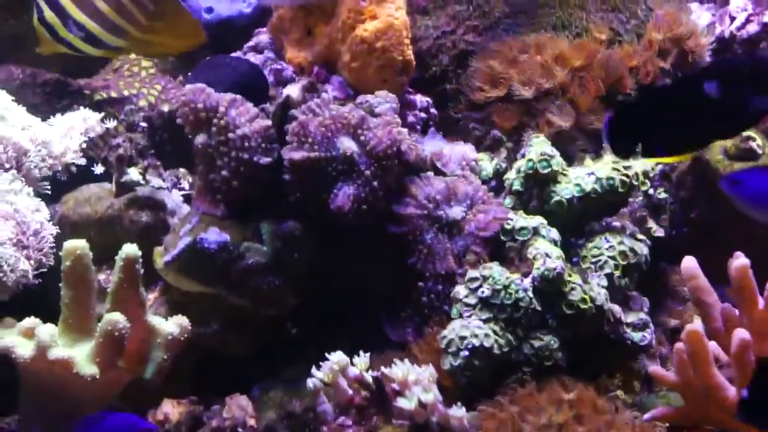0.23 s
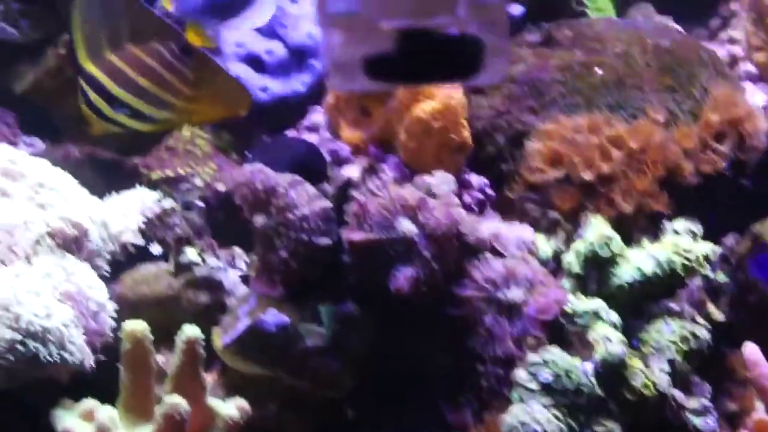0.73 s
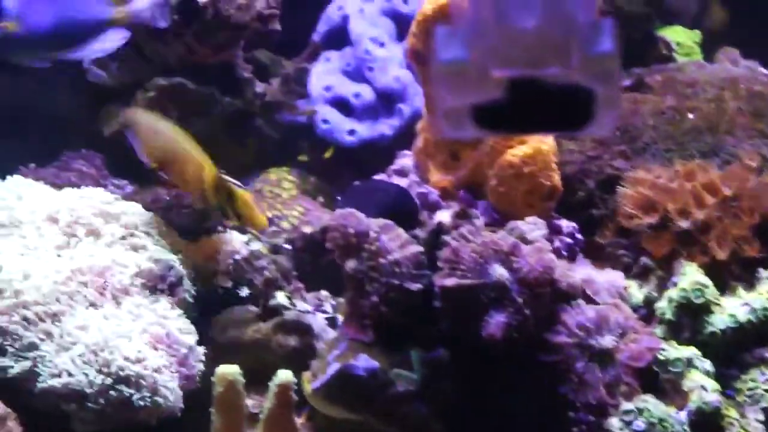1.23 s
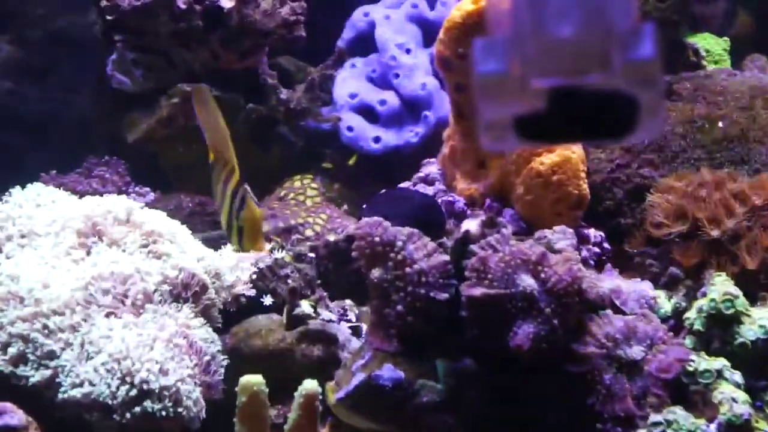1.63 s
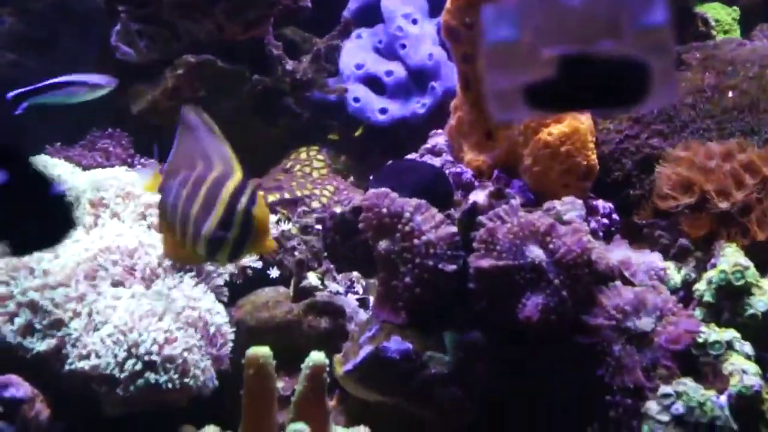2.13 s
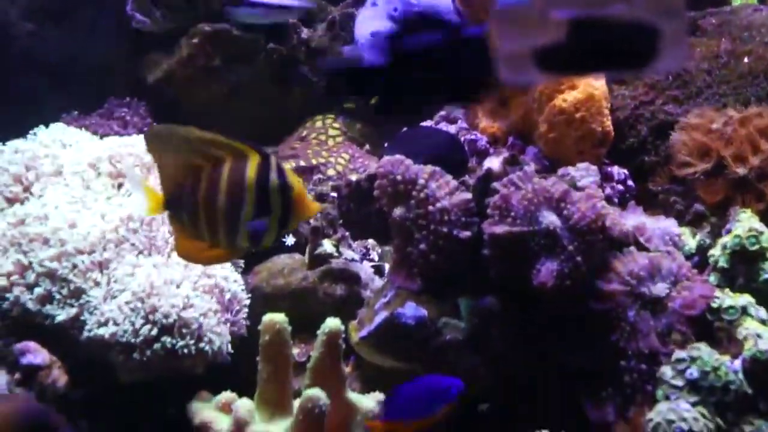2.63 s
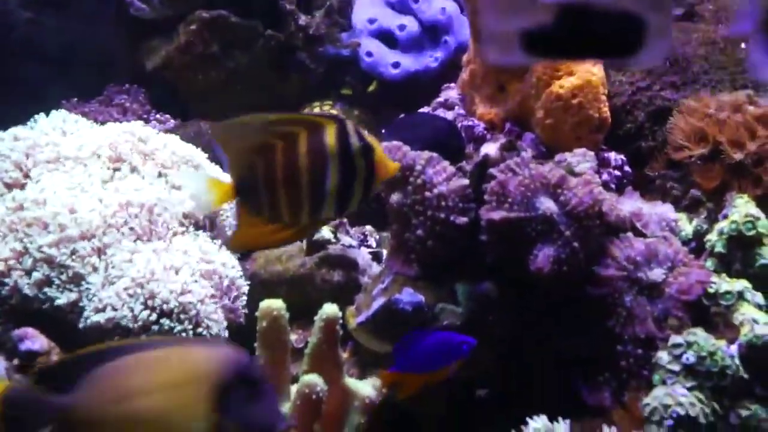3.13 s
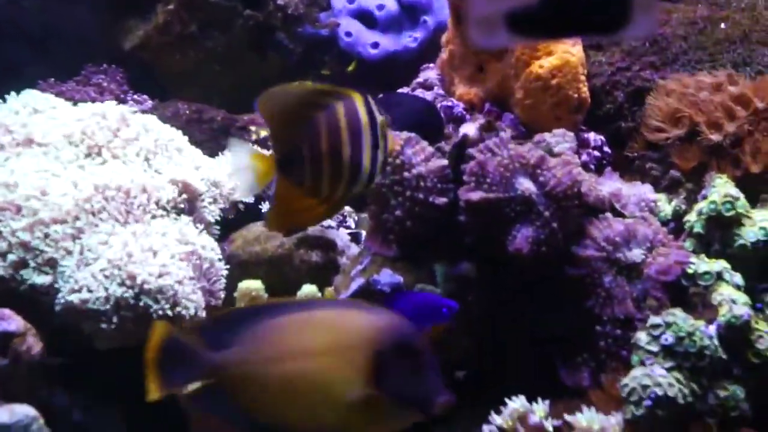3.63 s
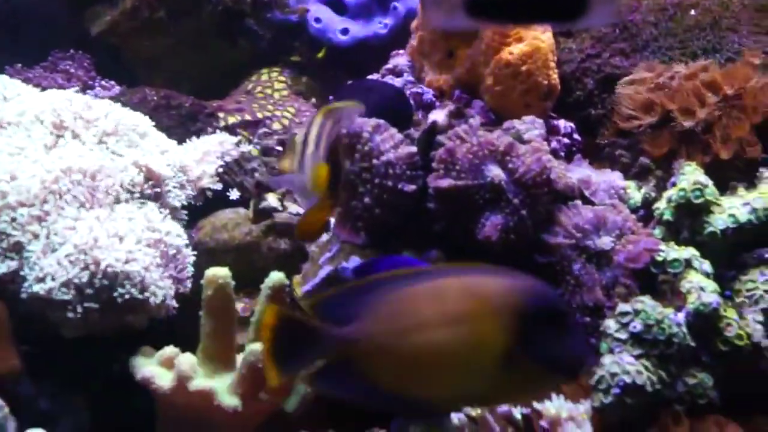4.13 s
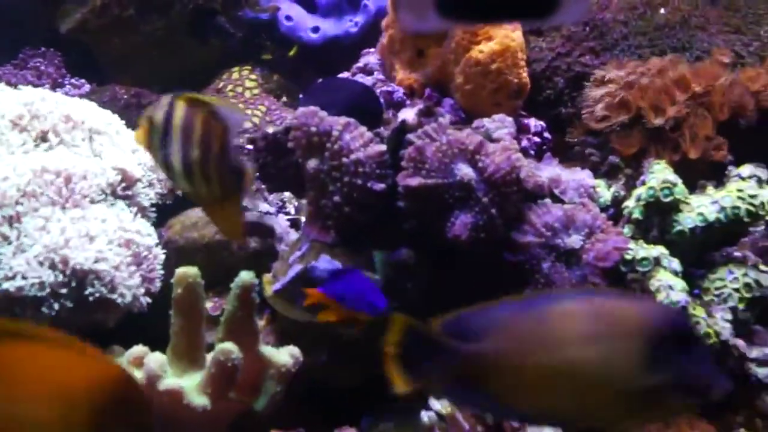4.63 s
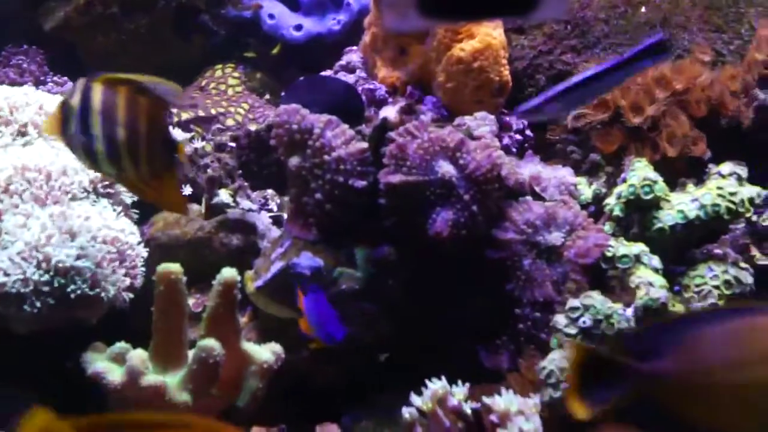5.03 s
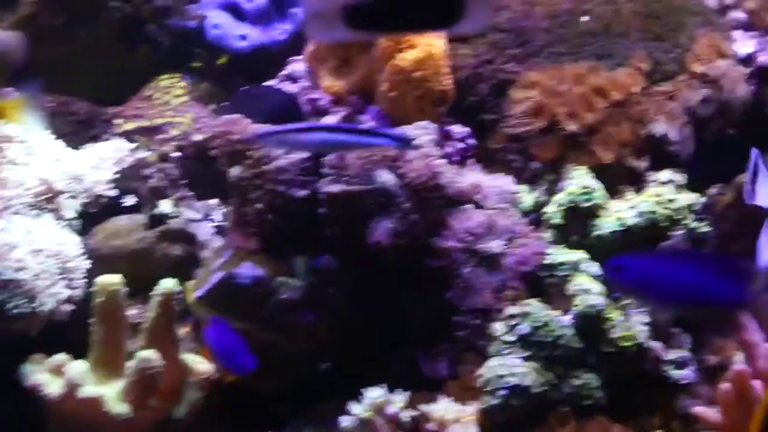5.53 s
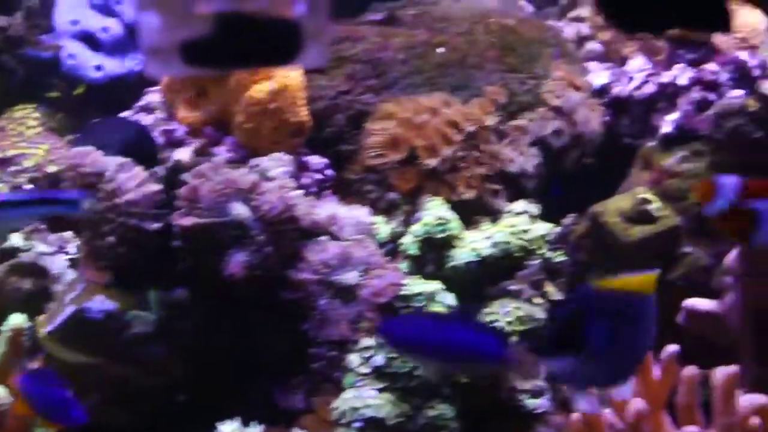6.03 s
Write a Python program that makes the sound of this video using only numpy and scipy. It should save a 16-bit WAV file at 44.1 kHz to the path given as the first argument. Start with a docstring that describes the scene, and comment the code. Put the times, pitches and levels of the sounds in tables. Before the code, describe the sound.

Aquarium pumps hum steadily with a soft watery wash and faint bubbling, while a bump, a knock and one sharp snap sound across the room.

```python
"""Under a home aquarium, close to the cabinet, a hand-held camera's two microphones hear the pumps throughout:
motor harmonics of the mains, noise of water and motors ringing in the cabinet, and short rising bubble rings.
Across the room come a soft bump at 1.2 s, a dull knock at 1.6 s and one sharp snap at 4 s: each is a set of
delayed impulses and a short noise tail, coloured by the modes of the struck thing."""
import sys
import numpy as np
from scipy import signal
from scipy.fft import rfft, irfft
from scipy.io import wavfile
from scipy.ndimage import uniform_filter1d

SR = 44100
rng = np.random.default_rng(int(sys.argv[2]) if len(sys.argv) > 2 else 0)


def dump(signal):
    """Clip the signal to [-1, 1] and save it as 16-bit WAV at the path in sys.argv[1]."""
    limited = np.clip(np.atleast_2d(signal).T, -1, 1)
    pcm = np.round(limited * 32767).astype(np.int16)
    wavfile.write(sys.argv[1], SR, pcm)


N = 277830
TIME = np.arange(N) / SR  # s

MAINS_HZ = 49.964
# strong motor harmonics: (multiple of the mains [1], left level [dB RMS], right level [dB RMS])
HUM_LINES = [(1, -71.0, -70.3), (2, -63.1, -63.9), (3, -66.8, -65.1), (4, -53.0, -49.8), (5, -69.3, -70.7),
             (6, -39.0, -36.9), (7, -58.3, -54.4), (8, -56.5, -56.4), (10, -66.4, -57.8),
             (11, -64.1, -69.6), (13, -67.7, -66.1), (14, -62.3, -64.5), (15, -68.3, -61.1),
             (17, -65.9, -58.2), (18, -64.5, -61.0)]
# tooth whine of a motor, stronger on the right: (multiple of the mains [1], left [dB RMS], right [dB RMS])
WHINE_LINES = [(54, -75, -69), (56, -75, -66)]
# the remaining, faint harmonics: level, change per multiple, random spread
FAINT_MULTIPLES = range(9, 40)
FAINT_DB, FAINT_SLOPE_DB, FAINT_SCATTER_DB = -70, -0.2874, 4
IN_STEP_HZ, SCRAMBLE_RAD = 430, .9  # lines above this differ in phase between microphones, by this spread

# water and motor wash: (frequency [Hz], left [dB per Hz], right [dB per Hz], likeness of channels [-1..1])
WASH_SPECTRUM = [(20, -103, -103, .3), (60, -93, -93, .1), (132, -83, -83, -0.23), (198, -77.5, -79, 0.32),
                 (250, -82.5, -77, 0.29), (360, -86, -77.5, 0.69), (575, -79, -77.5, 0.28),
                 (1230, -81, -79.5, 0.43), (2010, -84, -82.5, -0.036), (2230, -82.5, -80.5, 0.11),
                 (2920, -84, -83, 0.027), (3220, -87, -88, -0.31), (4640, -88.5, -90, 0.1),
                 (6540, -92, -93, -0.072), (8270, -92.5, -92.5, 0.019), (10500, -97, -97, -0.11),
                 (11900, -100, -100, 0.23), (12300, -103, -103, -0.1)]
# narrow wavering tones in the wash: (frequency [Hz], width [Hz], left level [dB RMS], right level [dB RMS])
WAVERING_TONES = [(274, 4.2, -60, -61), (303.4, 9.7, -56.5, -71), (334.3, 4.2, -56, -58.5),
                  (369, 14, -59.5, -54), (400.3, 11.4, -56, -79), (490, 3.2, -60.5, -66),
                  (662, 2.9, -71, -69), (1120, 75, -82, -88.5), (1312, 4, -84, -57.5),
                  (1467, 3.3, -61.5, -66.5), (2355, 9.3, -61.5, -69), (6730, 120, -74, -74),
                  (7730, 61, -72, -76)]

# skimmer bubbles: rate, middle pitch, level of the strongest, time to the ring's peak
BUBBLES_A_SECOND, BUBBLE_HZ, BUBBLE_DB, BUBBLE_S = 10, 8000, -57, .006

# what each struck thing rings with: (frequency [Hz], width [Hz], gain at centre [dB])
BUMP_RING = [(198, 150, 1.5), (600, 430, -26), (2600, 130, -4), (3930, 700, -12.5)]
KNOCK_RING = [(660, 120, -17), (990, 70, -9), (1095, 72, -1), (1320, 100, -14), (2050, 160, -11.5)]
SNAP_RING = [(550, 350, -20), (915, 55, -4.5), (1080, 110, -6.5), (1320, 50, -7.5), (1750, 69, -8),
             (2230, 150, -11), (2500, 170, 8.5), (3000, 250, -5.5), (4100, 280, -3.5), (7000, 4400, -6.5),
             (8300, 190, -25), (9700, 130, -8), (11200, 4400, -11.5)]
# paths from across the room, round a corner first, then off the walls: (delay [s], level [dB])
ROOM_PATHS = [(0, -12), (.0027, -5), (.0058, -2.5), (.0074, 0), (.0093, -5.5), (.0162, -1), (0.02, -2.5)]
# bump, knock, snap: (time [s], level [dB], fading of later paths [dB/s], likeness of tail [-1..1],
#                     left minus right [dB], left lateness [s], tail level [dB])
BLOW_SETTINGS = [(1.151, 6, 500, .5, -1.5, .00003, -37), (1.580, 10, 200, .3, -2.5, 0.00013, -37),
                 (3.99, 14.5, 13, -0.23, -4, 0.00012, -31)]
PUSH_HZ = 5500  # treble limit of a contact
SCRAPE_T60_S, SCRAPE_DB = .02, 8.  # fall time; level over the room tail's setting
ROOM_T60_S, ROOM_RISE_S = 0.29, 0.0016
TREBLE_HZ, TREBLE_FADE_DB_S = 4000, 32  # above this the tail fades faster, by this extra rate

TOP_HZ = 12500


def undb(db):
    """Turn decibels into gain."""
    return 10 ** (np.asarray(db) / 20)


def walk(rate):
    """Wander smoothly: random levels held 1 / rate s and averaged twice, with a spread near 1."""
    hold = int(SR / rate)
    held = np.repeat(rng.standard_normal(N // hold + 1), hold)
    slewed = uniform_filter1d(uniform_filter1d(held, hold), hold)
    return 1.3 * slewed[:N]


def pair(like, size):
    """Mix shared and opposed noise into two complex spectra whose correlation is `like`."""
    mid, side = rfft(rng.standard_normal((2, size)))
    like = np.clip(like, -1, 1)
    shared = np.sqrt((1 + like) / 2) * mid
    opposed = np.sqrt((1 - like) / 2) * side
    return np.array([shared + opposed, shared - opposed])


def resonance(f, hz, width):
    """Response of one damped mode at the frequencies f, with gain 1 at its centre."""
    return 1j * f * width / (hz ** 2 - f ** 2 + 1j * f * width)


def faint_lines():
    """Weak harmonics fill the gaps between the strong ones, scattered in level at each microphone."""
    strong = [round(row[0]) for row in HUM_LINES]
    lines = []
    for multiple in FAINT_MULTIPLES:
        if multiple not in strong:
            scatter = FAINT_SCATTER_DB * rng.standard_normal(2)
            left_db, right_db = FAINT_DB + FAINT_SLOPE_DB * multiple + scatter
            lines.append((multiple, left_db, right_db))
    return lines


def motors():
    """Synchronous motors: lines locked to the mains, each wavering a little in level with the load."""
    mains_phase = 2 * np.pi * MAINS_HZ * TIME + .015 * walk(1.5)  # wanders by about .015 rad
    out = np.zeros((2, N))
    for multiple, left_db, right_db in HUM_LINES + WHINE_LINES + faint_lines():
        # spread through the mains cycle, so that the hum drones and does not throb
        phase = round(multiple) * mains_phase + np.pi * round(multiple) ** 2 / 8
        # low lines are in step at both microphones; the room scrambles the higher ones
        lead = SCRAMBLE_RAD * rng.standard_normal() * (multiple * MAINS_HZ > IN_STEP_HZ)
        swing = np.sqrt(2) * undb(.3 * walk(3))  # sqrt(2): RMS to peak
        left = undb(left_db) * np.cos(phase + lead)
        right = undb(right_db) * np.cos(phase)
        out += swing * np.array([left, right])
    return out


def wash():
    """Water and motor wash: noise in octave bands that flicker a little, plus narrow cabinet tones."""
    f = np.fft.rfftfreq(N, 1 / SR) + 1e-3  # keeps the logarithm finite
    hz, *columns = np.transpose(WASH_SPECTRUM)
    left_db, right_db, like = (np.interp(np.log(f), np.log(hz), c) for c in columns)
    broad = pair(like, N) * undb([left_db, right_db]) * np.sqrt(SR / 2)
    out = np.zeros((2, N))
    for octave in range(4, 15):  # centred on 2 ** octave Hz
        band = np.clip(1 - np.abs(np.log2(f) - octave), 0, 1)
        flicker = undb(.7 * walk(10))
        out += flicker * irfft(broad * band, N)
    # a resonance passes pi / 2 times its width of white noise; the powers of the tones add
    power = 0
    for tone_hz, width, *levels_db in WAVERING_TONES:
        density = undb(levels_db)[:, None] ** 2 * SR / (np.pi * width)
        power = power + density * np.abs(resonance(f, tone_hz, width)) ** 2
    return out + irfft(pair(0.81, N) * np.sqrt(power), N)


def bubbles():
    """Tiny skimmer bubbles burst at random times: short high rings that glide up."""
    out, t = np.zeros((2, N + 2048)), np.arange(2048) / SR
    for when, pitch, size, side in rng.random((int(BUBBLES_A_SECOND * N / SR), 4)):
        hz = BUBBLE_HZ * 2 ** (1.2 * (pitch - .5))  # spread over 1.2 octaves
        envelope = t / BUBBLE_S * np.exp(1 - t / BUBBLE_S)
        ring = np.sin(2 * np.pi * hz * t * (1 + 1.5 * t)) * envelope
        gain = undb(BUBBLE_DB - 10 * size) * np.sqrt([[side], [1 - side]])
        start = int(when * N)
        out[:, start:start + len(t)] += gain * ring
    return out[:, :N]


def ringing_body(modes, f, t):
    """Response of a struck thing: its modes add in power, and the ring follows the blow."""
    size = len(t)
    power = sum(np.abs(undb(db) * resonance(f + 1, hz, width)) ** 2 for hz, width, db in modes)
    # folding the cepstrum gives minimum phase
    fold = irfft(np.log(power), size) * (t < t[size // 2])
    fold[0] /= 2
    return np.exp(rfft(fold))


def room_tail(hits, t, f, like, tail_db):
    """Countless reflections as fading noise, with a brief scrape of treble after each contact."""
    size = len(t)
    tail = (1 - np.exp(-t / ROOM_RISE_S)) * undb(tail_db - 60 * t / ROOM_T60_S)
    tail = tail + undb(tail_db + SCRAPE_DB - 60 * t / SCRAPE_T60_S)
    # the tails of the arrivals add in power
    swell = np.sqrt(np.abs(signal.fftconvolve(hits ** 2, tail ** 2)[:size]))
    noise = pair(like, size)
    low = 1 / (1 + (f / TREBLE_HZ) ** 4)
    bass = irfft(noise * low, size)
    treble = irfft(noise * (1 - low), size) * undb(-TREBLE_FADE_DB_S * t)
    return rfft(swell * (bass + treble))


def struck(modes, when_s, blow_db, fade_db_s, like, pan_db, lag_s, tail_db):
    """A blow across the room rings a body, heard along the early paths and in the room's tail."""
    size, start = SR // 2, int(when_s * SR)
    t, f = np.arange(size) / SR, np.fft.rfftfreq(size, 1 / SR)
    hits = np.zeros(size)
    for delay_s, path_db in ROOM_PATHS:
        hits[int(delay_s * SR)] += undb(blow_db + path_db - fade_db_s * delay_s)
    # a contact lasts a moment, so it pushes little treble
    push = rfft(hits) / (1 + 1j * f / PUSH_HZ) ** 4
    # sound from one side reaches the far microphone later and weaker
    lateness = np.exp(-2j * np.pi * f * np.array([[lag_s], [0]]))
    early = push * lateness * undb([[pan_db / 2], [-pan_db / 2]])
    heard = (early + room_tail(hits, t, f, like, tail_db)) * ringing_body(modes, f, t)
    out = np.zeros((2, N))
    out[:, start:start + size] = irfft(heard, size)
    return out


def scene():
    """Hum, wash and bubbles throughout; a bump, a knock and a snap across the room."""
    out = motors() + wash() + bubbles()
    for modes, blow in zip((BUMP_RING, KNOCK_RING, SNAP_RING), BLOW_SETTINGS):
        out += struck(modes, *blow)
    return out


def record(dry):
    """The camera rolls off the highest treble and cuts the top."""
    soft = signal.sosfilt(signal.butter(10, 12000, fs=SR, output="sos"), dry)
    return signal.sosfilt(signal.ellip(10, .2, 80, TOP_HZ, fs=SR, output="sos"), soft)


dry = scene()
out = record(dry)
dump(out)
```